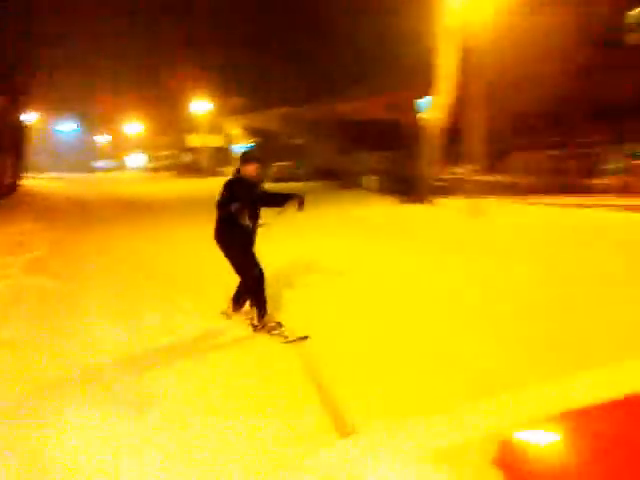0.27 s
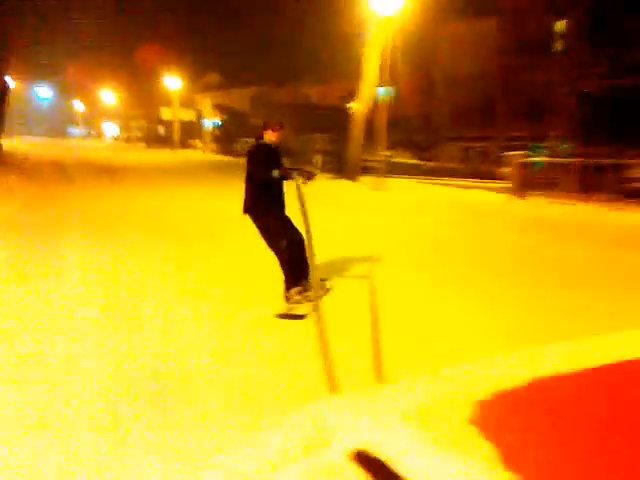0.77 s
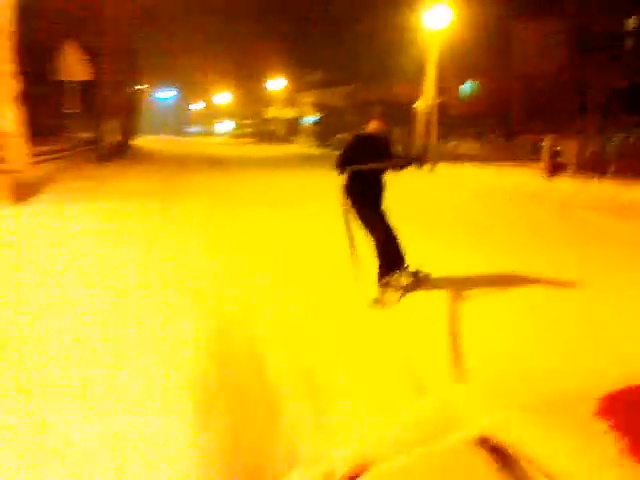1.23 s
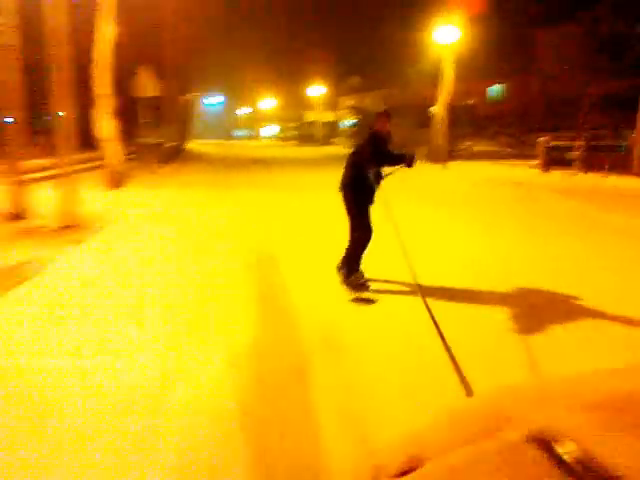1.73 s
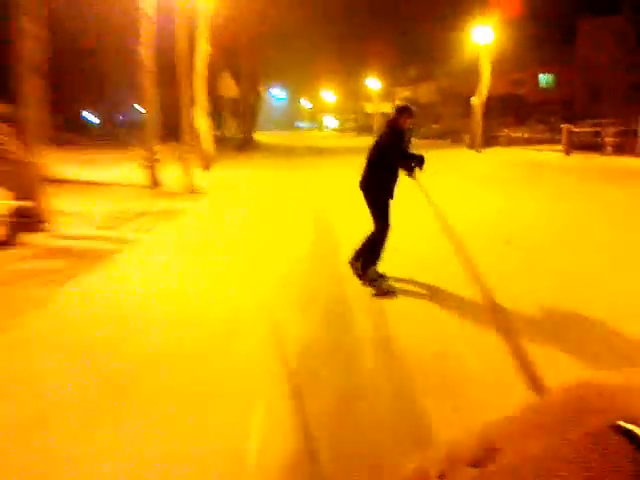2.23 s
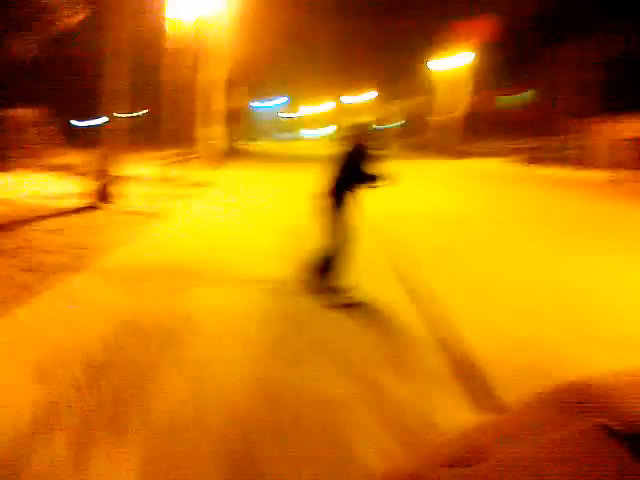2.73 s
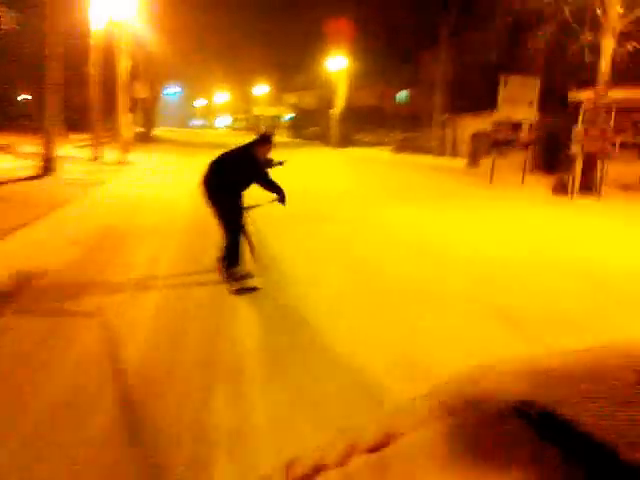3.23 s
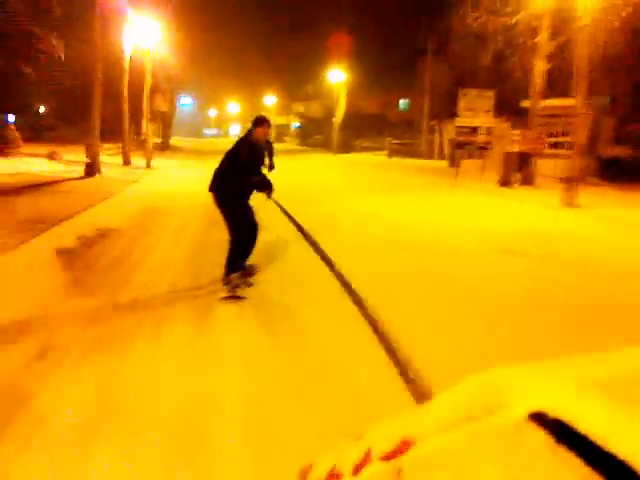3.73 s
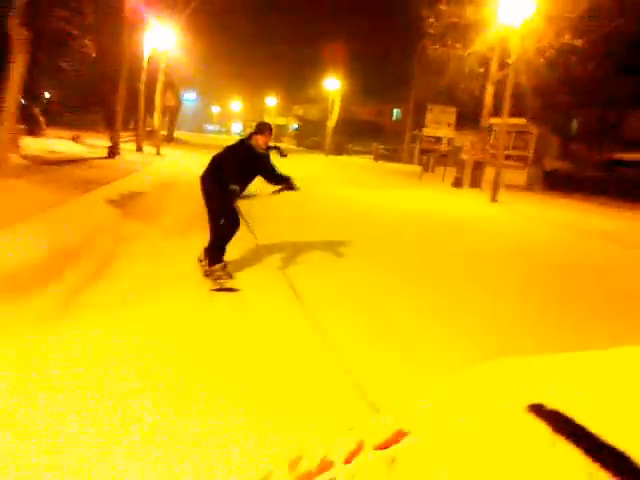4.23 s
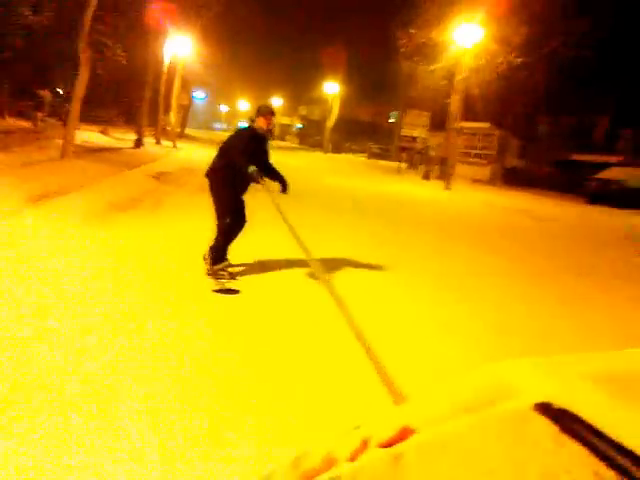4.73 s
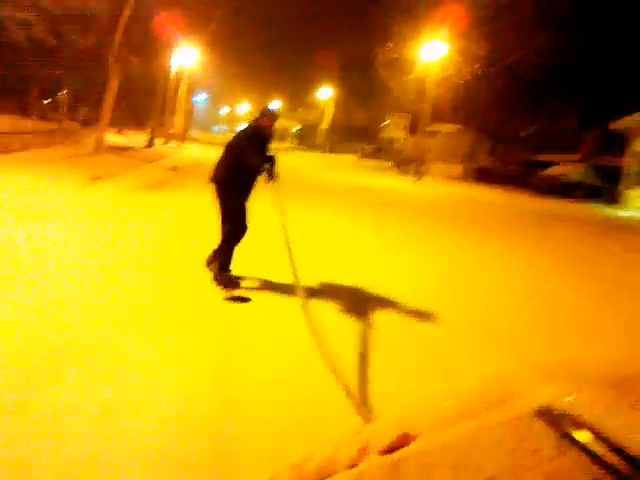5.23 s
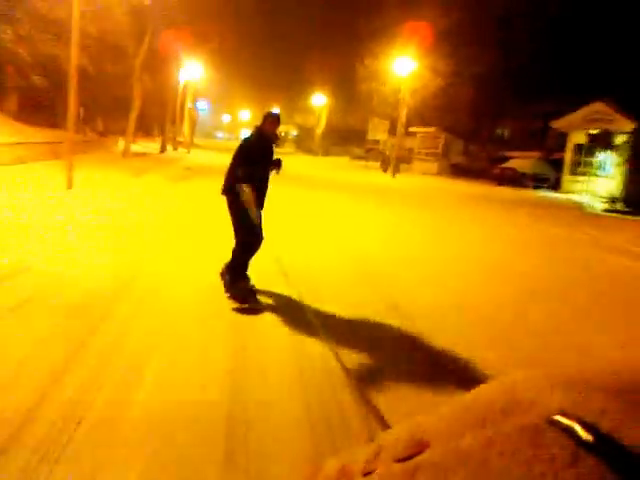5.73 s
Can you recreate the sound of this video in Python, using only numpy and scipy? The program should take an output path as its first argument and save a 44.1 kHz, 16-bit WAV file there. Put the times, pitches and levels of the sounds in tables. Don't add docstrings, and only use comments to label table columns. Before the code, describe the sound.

On a snowy street at night, a small camera held out of a moving car is battered by wind. Deep rumble and thumps run throughout; ragged rasping gusts build to about two and a half seconds, then tyres crunch through crusty snow. A quieter rumbling lull follows, and a hard bright blast of air hits near the end.

```python
import sys
import numpy as np
from scipy import signal
from scipy.fft import rfft, irfft, next_fast_len
from scipy.io import wavfile
from scipy.ndimage import uniform_filter1d, map_coordinates

SR = 44100
rng = np.random.default_rng(int(sys.argv[2]) if len(sys.argv) > 2 else 0)


def pcm_store(signal):
    levels = np.round(np.clip(np.atleast_2d(signal), -1, 1) * 32767)
    wavfile.write(sys.argv[1], SR, levels.astype(np.int16).T)


def volts(x):
    e = np.asarray(x, float) / 20
    return 10 ** e


N = 264284

# time_s, level_db
AIRSTREAM = [(0.0, -21.5), (1.3, -18.5), (1.47, -18.5), (2.5, -18.5), (3.62, -20), (3.8, -23),
             (5.15, -18.5), (5.34, -15.5), (5.99, -21.5)]
POWDER_EDGE_S = .06


def unit(x):
    return x / np.sqrt(np.mean(x ** 2) + 1e-20)


def curves(rows):
    s, *columns = np.transpose(rows)
    return [np.interp(np.arange(N) / SR, s, column) for column in columns]


def wobble(rate):
    knots = rng.standard_normal(int(N * rate / SR) + 4)
    return map_coordinates(knots, [np.arange(N) * rate / SR])


def rush(spectrum, patchy_db):
    z = signal.stft(rng.standard_normal(N), nperseg=512)[2]
    field = uniform_filter1d(rng.standard_normal(z.shape), size=8, axis=0)
    field = uniform_filter1d(field, size=6, axis=1)
    x = signal.istft(z * volts(patchy_db * unit(field)), nperseg=512)[1][:N]
    padded = next_fast_len(N + 8192)
    hz, db = np.transpose(spectrum)
    gain_db = np.interp(np.log(np.fft.rfftfreq(padded, 1 / SR) + 1), np.log(hz + 1), db)
    return unit(irfft(rfft(x, padded) * volts(gain_db), padded)[:N])


def steady(x, span_s, share):
    level = np.sqrt(np.abs(uniform_filter1d(x ** 2, size=int(span_s * SR))) + .02)
    return unit(x / level ** share)


def swells(times, levels_db, lives, lead):
    t, power = np.arange(N) / SR, np.zeros(N)
    for s, db, life in zip(times, levels_db, lives):
        span = slice(max(int((s - 3 * life) * SR), 0), int((s + 8 * life) * SR))
        u = np.clip((t[span] - s) / max(1.45 * life, .002) + lead, 0, None)
        power[span] += (volts(db) * (u * np.exp(1 - u)) ** 2) ** 2
    return power


def bursts(times, levels_db, lives):
    t, power = np.arange(N) / SR, np.zeros(N)
    for s, db, life in zip(times, levels_db, lives):
        span = slice(max(int((s - 3 * life) * SR), 0), int((s + 5 * life) * SR))
        power[span] += (volts(db) * np.exp(-((t[span] - s) / life - .8) ** 2)) ** 2
    return power


def plateaus(starts, lengths, levels_db, edge_s):
    t = np.arange(0, N, 16) / SR
    inside = np.minimum(t - starts[:, None], (starts + lengths)[:, None] - t)
    shape = np.clip(inside / edge_s + .5, 0, 1)
    power = np.sum((volts(levels_db)[:, None] * shape) ** 2, axis=0)
    return np.interp(np.arange(N) / SR, t, power)


def gusts():
    # start_s, length_s, eddy_db, tearing_db
    gust_rows = [(0.009, 0.035, -13.5, -23), (0.123, 0.17, -17, -44), (0.413, 0.099, -20, -22.5),
                 (0.553, 0.075, -17.5, -37), (0.632, .11, -12.5, -12), (0.792, 0.071, -15.5, -19),
                 (1.039, 0.074, -17, -16.5), (1.18, 0.16, -17, -24), (1.383, 0.19, -14.5, -12.5),
                 (1.6, 0.12, -16.5, -10), (1.782, 0.2, -14, -13), (1.975, 0.21, -16.5, -24),
                 (2.16, 0.172, -15, -14), (2.347, .035, -13.5, -14), (2.394, .042, -13.5, -14),
                 (2.449, .09, -14.5, -14), (5.17, .05, -20, -35), (2.531, 0.073, -16, -21),
                 (2.615, 0.117, -16.5, -15.5), (2.756, 0.055, -21, -35), (2.88, .12, -17.5, -28),
                 (3.035, 0.026, -17.5, -32), (3.185, 0.067, -22, -29), (3.281, 0.049, -14.5, -25),
                 (3.361, 0.053, -15, -22), (3.539, 0.023, -12, -23), (3.599, 0.086, -15.5, -20.5),
                 (4.021, 0.066, -21, -25), (4.399, 0.043, -17, -26), (4.768, 0.079, -15.5, -28),
                 (5.008, 0.025, -23.5, -25), (5.23, 0.089, -25, -40), (5.34, 0.31, -16.5, -23),
                 (5.823, 0.18, -16, -13.5)]
    edge_s, lull_db, lull_tear_db = .02, -7.5, -36
    s, length, eddy_db, tear_db = np.transpose(gust_rows)
    eddy = plateaus(s, length, eddy_db, edge_s) + volts(curves(AIRSTREAM)[0] + lull_db) ** 2
    tearing = plateaus(s, length, tear_db, edge_s) + volts(lull_tear_db) ** 2
    return 10 * np.log10([eddy, tearing])


def body_rumble(gust_db):
    # time_s (each peaks 24 ms later), peak_db
    heave_rows = [(0.02, -11), (0.105, -9), (0.2, -9), (0.451, -2), (0.663, -4.5), (0.8, -9), (1.049, -5),
                  (1.18, -12), (1.28, -4.5), (1.423, -4), (1.579, -4), (1.758, -7), (1.969, -6),
                  (2.147, -6), (2.432, -6), (2.55, -7), (2.679, -4), (2.77, -6), (2.888, -5), (3.088, -11),
                  (3.29, -10), (3.548, -4.5), (3.632, -6), (3.786, -11), (4.054, -10), (4.241, -8),
                  (4.392, -11), (4.605, -8), (4.772, -7), (4.958, -14), (5.2, -8), (5.28, -7), (5.369, -4),
                  (5.509, -5), (5.81, -2), (5.9, -6)]
    # pitch_hz, density_db (per Hz)
    swing = [(7, -35), (14, -6), (28, 6), (50, 4.5), (85, -0.5), (115, -12.5), (160, -39.5), (260, -120)]
    s, db = np.transpose(heave_rows)
    pushes = swells(s, db - 8.5, np.full(len(s), .029), lead=0.43)
    rumble = np.sqrt(volts(curves(AIRSTREAM)[0] - 6) ** 2 + volts(gust_db - 11) ** 2 + pushes)
    rumble = rumble * volts(1.1 * wobble(9) + 1.8 * wobble(25))
    return rumble * steady(rush(swing, patchy_db=0), span_s=.04, share=.95)


def eddies(gust_db, flutter):
    # pitch_hz, density_db (per Hz)
    eddy_spectrum = [(15, -52.5), (40, 1.5), (90, 1.5), (150, -1), (300, -7), (500, -13.5), (900, -18),
                     (2000, -31.5), (4000, -83), (16000, -120)]
    level = volts(gust_db + 0.71 + 1.26 * wobble(18))
    return level * unit(flutter) * steady(rush(eddy_spectrum, patchy_db=2), span_s=.03, share=0.58)


def rim_tears(tear_db):
    # time_s (each peaks 4 ms later), peak_db, thump_db
    single_tears = [(0.648, -20, 0), (0.679, -12.5, 5), (0.815, -9.5, -6.5), (0.83, -17, -2),
                    (0.895, -16, -4), (1.043, -15.5, -14), (1.187, -8.5, 2.5), (1.268, -11, -3),
                    (1.401, -7, 4.5), (1.43, -8, -9), (1.4672, -6, -4), (1.503, -6.5, -1.5),
                    (1.635, -4.5, -0.5), (1.66, -8, 1), (1.697, -9, 2), (1.789, -8.5, 0), (1.875, -12, -2),
                    (1.943, -9, -1.5), (2.17, -12.5, -1), (2.208, -9.5, 2), (2.233, -7, 3), (2.291, -9.5, -2),
                    (2.317, -6.5, 3.5), (2.361, -2.5, -8), (2.42, -6, -0.5), (2.476, -5, -3), (4.793, -20, 4),
                    (5.2805, -17, 6), (5.345, -20.5, 12.5), (5.5013, -12.5, 2.5), (1.197, -9, 0),
                    (1.216, -12, 0), (1.312, -9.5, -1), (1.337, -16, 5), (1.444, -8.5, -0.5), (1.555, -12, 0),
                    (1.574, -15, 1), (1.602, -17, 1), (1.619, -16, 4), (1.678, -10.5, 2), (1.854, -17, 7),
                    (1.925, -13.5, 0), (2.113, -15.5, 3), (2.134, -15.5, 1), (2.191, -13, 4),
                    (2.264, -10.5, 0), (2.303, -11.5, 1), (2.325, -10, 0), (2.3486, -14, 2), (2.372, -6, -2),
                    (2.398, -11.5, 3), (2.432, -7, -4), (2.452, -19, 0), (2.4614, -12.5, 2), (2.491, -11, -1),
                    (2.516, -9, -1.5), (2.527, -13, 3),
                    (0.015, -22, 4), (3.195, -27, 18), (3.216, -27.5, 15.5), (4.416, -30, -2),
                  (4.6276, -18, -7), (4.812, -28, 15.5), (5.018, -27, 4), (5.393, -19.5, 9.5),
                  (5.426, -15, 3), (5.467, -14, 2.5), (5.536, -17.5, 9), (5.63, -17, 4),
                  (5.241, -23.5, 0.5), (5.265, -24, -2), (5.358, -15, -1), (5.413, -18.5, 1),
                  (5.455, -19, 1), (5.513, -15.5, -2), (5.616, -20, 1), (5.075, -24, 2), (4.82, -24, 3),
                  (0.03, -20, 5), (0.153, -26, 10), (0.217, -25, 9), (0.272, -27, 11), (0.438, -25, 7),
                  (0.485, -22, 5), (0.588, -23, 6), (0.702, -16, 4), (0.733, -19, 3), (0.845, -18, 2),
                  (4.045, -24, 8), (0.665, -17, 2)]
    life_s, gap_s, shed_db = 0.0036, 0.03, -9
    chance = rng.standard_normal((250, 4))
    s = np.cumsum(gap_s * np.exp(.35 * chance[:, 0]))
    db = shed_db + np.interp(s * SR, np.arange(N), tear_db) + 2.5 * chance[:, 1]
    shed = np.transpose([s, db, 2.06 * chance[:, 2], life_s * np.exp(0.13 * chance[:, 3])])
    listed = [(*row, life_s) for row in single_tears]
    return np.vstack([shed[s < N / SR], listed])


def port_thumps(tears):
    # pitch_hz, density_db (per Hz)
    thump = [(60, -56), (120, -15), (250, 13), (500, 8), (900, -7.5), (1600, -35), (4000, -120)]
    s, db, thump_db, life = tears.T
    power = swells(s, db + thump_db - 4.5, 1.33 * life, lead=0.47)
    return np.sqrt(power) * steady(rush(thump, patchy_db=2), span_s=.012, share=.7)


def tear_rasps(tears, tear_db, flutter, snaps):
    # pitch_hz, density_db (per Hz)
    rasp = [(100, -87.5), (300, -35), (700, 4), (1200, 3), (2000, -2), (3000, -10.5), (4200, -24.5),
            (7000, -40), (11000, -47.5), (16000, -67.5)]
    s, db, _, life = tears.T
    level = np.sqrt((volts(tear_db - 20) * unit(flutter)) ** 2 + bursts(s, db - 8, 1.35 * life))
    return level * steady(unit(snaps * rush(rasp, patchy_db=0.1)), span_s=.008, share=.8)


def slap_blast(slaps, snaps):
    # pitch_hz, density_db (per Hz)
    blast = [(500, -5.5), (1200, -3.5), (3000, -9), (6000, -24), (9000, -37), (16000, -44)]
    s, db, _, life = np.transpose(slaps)
    level = np.sqrt(bursts(s, db - 6, 1.3 * life))
    return level * steady(unit(snaps * rush(blast, patchy_db=1)), span_s=.007, share=.8)


def wind(gust_db, tear_db):
    # time_s (each peaks about one life later), peak_db, thump_db, life_s
    slaps = [(5.8272, -15, -18, 0.0015), (5.835, -14, 6, 0.003), (5.8428, -14, -3, 0.0037),
             (5.8524, -18, -6, 0.0063), (5.862, -15.5, 7, 0.0041), (5.869, -7.5, 2, 0.0031),
             (5.874, -7.5, -6.5, 0.0033), (5.88, -9, -4, 0.002), (5.893, -17.5, -2, 0.0039),
             (5.901, -30, -4, 0.0056), (5.905, -13.5, -18, 0.0013), (5.9415, -15.5, -7, 0.0017),
             (5.95, -13, -1, 0.0022), (5.954, -15, -6, .002), (5.97, -27, 3, .003),
             (5.9585, -23, -1, 0.0023), (5.979, -23, -8, 0.0043)]
    flutter = volts(1.6 * wobble(40) + 2.4 * wobble(120))
    tears = rim_tears(tear_db)
    low = body_rumble(gust_db) + eddies(gust_db, flutter) + port_thumps(np.vstack([tears, slaps]))
    low = .8 * np.tanh(low / .8)
    snaps = volts(3.5 * wobble(450))
    return low + tear_rasps(tears, tear_db, flutter, snaps) + slap_blast(slaps, snaps)


def snow_spray(level_db, tear_db, grain):
    # start_s, length_s, level_db
    shower_rows = [
        (0.558, 0.12, -52.5),
        (1.081, 0.16, -50),
        (1.203, 0.13, -44),
        (2.0, 0.21, -56.5),
        (2.565, 0.48, -45.5),
        (2.997, .38, -43.5),
        (3.926, .16, -59),
    ]
    # pitch_hz, density_db (per Hz)
    fizz = [(2500, -16), (4500, -4.5), (7000, -11.5), (11000, -21.5), (16000, -44)]
    wheel_db = -54 + 1.5 * (level_db + 20.5)
    power = volts(wheel_db) ** 2 + volts(tear_db - 46.5) ** 2 + volts(-65) ** 2
    spray_db = 10 * np.log10(power + plateaus(*np.transpose(shower_rows), POWDER_EDGE_S))
    out = volts(spray_db - 5.5) * unit(volts(0.48 * grain) * rush(fizz, patchy_db=2))
    specks = (rng.random(N) < 60 / SR) * volts(3.1 * rng.standard_normal(N))
    band = signal.butter(2, [6500, 13000], "bandpass", fs=SR, output="sos")
    return out + volts(spray_db + 6.5) * signal.sosfilt(band, specks)


def crust_breaks(level_db):
    # start_s, peak_db, pitch_hz, life_s
    crunch_rows = [(2.5966, -3.5, 1660, 0.0037), (2.8585, 1.5, 2120, 0.0037), (2.95, -1, 1450, 0.0031),
                   (2.9858, -5, 1870, 0.0065), (3.0005, 1.5, 1350, 0.0016), (3.0447, -3, 2200, 0.003),
                   (3.0713, -3.5, 1290, 0.005), (3.108, -1.5, 1730, 0.005), (3.13, -1, 1410, 0.0037),
                   (3.932, -13.5, 2400, 0.0056), (3.1564, 1, 1280, 0.003), (3.252, -0.5, 1910, 0.0084),
                   (3.263, 0, 2140, 0.012), (3.289, -2.5, 1940, 0.003), (3.3105, -4.5, 1810, 0.009),
                   (3.323, -2, 1810, 0.0033), (3.3707, -2, 1320, 0.0036), (3.3985, -1, 1920, 0.0061),
                   (3.4096, -1.5, 1626, 0.023), (3.4178, -2, 1740, 0.0029), (3.4464, -5, 1196, 0.013),
                   (3.464, -1.5, 1770, 0.0043), (3.513, -9.5, 1250, 0.0087), (3.5927, -6, 1260, 0.0072),
                   (3.6416, -2.5, 1860, 0.0039), (3.734, 0, 1810, 0.004), (3.7402, -4, 1365, 0.0068),
                   (3.753, -6.5, 1770, 0.0086), (3.8992, -8, 1390, 0.013), (4.016, -12.5, 1820, 0.0058),
                   (2.6895, -14, 1230, .004), (2.726, -12, 1380, .004), (2.771, -14, 1350, 0.0036),
                   (2.8816, -12, 1680, .004), (3.135, -2, 1630, .003), (3.1405, 1, 1490, .003),
                   (3.1944, -10, 1090, .004), (3.2376, -7, 2260, .004), (3.6608, -13, 1500, .004),
                   (3.7065, -10, 1950, .004), (3.807, -18, 1300, .004), (3.844, -13, 1500, .004),
                   (3.865, -15, 1700, .004), (3.973, -16.5, 2170, 0.0044)]
    crumbs_per_s, crumb_db, crumb_hz = 30, -3, 1600
    out, t = np.zeros(N), np.arange(SR // 16) / SR
    luck = rng.random((60, 3))
    crumb_s = 2.6 + (np.arange(len(luck)) + luck[:, 0]) / crumbs_per_s
    breaks = list(crunch_rows)
    for s, (_, a, b) in zip(crumb_s, luck):
        if s < 4.05:
            db = level_db[int(s * SR)] + crumb_db + 8 * a
            breaks.append((s, db, crumb_hz * (0.699 + 0.736 * b), .005))
    for s, db, hz, life in breaks:
        u = t / max(life, .002)
        ring = .55 * np.sin(2 * np.pi * hz * t) * np.exp(-1.5 * u)
        hit = u ** 0.62 * np.exp(-1.8 * u) * (rng.standard_normal(len(t)) + ring)
        band = signal.butter(4, [.6 * hz, 1.4 * hz], "bandpass", fs=SR, output="sos")
        hit = signal.sosfilt(band, hit)
        seat = out[round((s - .0015) * SR):][:len(t)]
        seat += volts(db - 2.5) * (hit / np.abs(hit).max())[:len(seat)]
    return out


def tyres(tear_db):
    # time_s, level_db
    crust_level = [(0.1, -59), (0.63, -45), (1.01, -25.5), (1.28, -22), (1.44, -32.5), (1.83, -40),
                   (2.22, -31), (2.34, -31.5), (2.88, -21.5), (3.05, -16), (3.18, -18), (3.31, -19),
                   (3.45, -16), (3.54, -29), (3.81, -24.5), (4.02, -38.5), (4.3, -38), (4.7, -43.5)]
    # pitch_hz, density_db (per Hz)
    snow = [(350, -28), (600, -11.5), (728, -8), (817, -0.5), (935, -7), (1320, 1.5), (2270, -4),
            (2750, -9.5), (3060, -14), (3640, -18.5), (4320, -31.5), (6000, -37), (7800, -62),
            (13200, -120)]
    level_db, = curves(crust_level)
    grain = 1.2 * wobble(40) + 2.6 * wobble(220)
    hiss = volts(level_db - 1.97) * unit(volts(grain) * rush(snow, patchy_db=0))
    return hiss + snow_spray(level_db, tear_db, grain) + crust_breaks(level_db)


def grit():
    # time_s, peak_db, band_8khz_db, band_4_5khz_db (bands relative to the peak)
    grain_rows = [(0.5891, -51.5, 10, 0), (1.0174, -44.5, 6, -3), (1.218, -49.5, 0, 6),
                  (1.2845, -42, -6, 3.5), (1.4611, -47, -4, 15), (1.488, -45, -14, 9),
                  (1.511, -33, -21, -6.5), (1.5399, -38, -19, -7), (1.6167, -48, -3, -1),
                  (2.36, -46, 1, 16), (2.5152, -42, -1, 17), (2.9512, -42, 0, 0), (3, -38, -16, -7),
                  (3.108, -33.5, -5, 1), (3.5673, -59, -21, 3), (3.6405, -53, 16, 18), (3.734, -63, 19, 11),
                  (3.934, -57, 7, 14), (4.0533, -50, 12, 0), (4.061, -58, 16, 6), (4.39, -45, 0, -3),
                  (5.678, -57.5, -4, 5), (5.8274, -18, -15, 6), (5.8374, -51, 1, 11), (5.862, -22, -8, -3),
                  (5.882, -33, -9, -2), (5.892, -20.5, -12, -6), (5.976, -41.5, -10, 7),
                  (5.9884, -38.5, -17, -2), (1.0966, -48.5, -10, -5), (1.131, -46.5, -12, -5),
                  (1.234, -51, -5, -5), (1.2692, -45, -10, -5), (1.296, -50, 0, 0), (3.6605, -62, 5, 12),
                  (3.958, -62, 5, 12), (4.315, -66, 0, 8), (4.51, -64, 3, 5), (4.535, -62, 3, 5),
                  (4.78, -60, 0, 3), (4.955, -64, 3, 8), (5.015, -63, 3, 8), (5.175, -62, 3, 5),
                  (0.22, -62, 0, 5), (0.46, -64, 0, 5), (5.345, -62, 0, 5)]
    out, t = np.zeros(N + SR), np.arange(-64, 64) / SR

    def blip(hz, width_s):
        return np.cos(2 * np.pi * hz * t) * np.exp(-(t / width_s) ** 2)

    for s, db, mid_db, low_db in grain_rows:
        tick = blip(12500, .00009)
        tick += volts(mid_db + 4.5) * blip(8200, 0.00019)
        tick += volts(np.minimum(low_db, 6) - 3) * blip(4500, 0.00014)
        out[max(round(s * SR) - 64, 0):][:len(t)] += volts(db - 0.5) * tick
    return out[:N]


def whistle():
    # start_s, length_s, pitch_hz, rise_hz_per_s, level_db, fade_db_per_s
    edge_tone = (5.733, .078, 815, 2200, -29, -50)
    start, length, hz, rise, db, fade = edge_tone
    u = np.arange(N) / SR - start
    gate = np.clip(np.minimum(u, length - u) / 0.012, 0, 1)
    level = volts(db + fade * np.clip(u, 0, length) + 1.9 * wobble(43.16))
    return level * gate * np.sin(2 * np.pi * (hz + rise * u / 2) * u)


def flap():
    # centre_s, half_length_s, pitch_hz, peak_db
    flutter_tone = (4.803, 0.0358, 135.5, -9)
    centre, half, hz, db = flutter_tone
    u = np.arange(N) / SR - centre
    return volts(db) * np.exp(-(u / half) ** 2) * np.sin(2 * np.pi * hz * u)


def powder():
    # pitch_hz, density_db (per Hz)
    sizzle_spectrum = [(2600, -58), (3300, -14), (3650, -1), (4000, -8), (4600, -37), (6000, -120)]
    # start_s, length_s, level_db
    sizzle_rows = [
        (1.08, 0.23, -50),
        (2.74, .25, -42),
        (3.2, 0.18, -50),
    ]
    # pitch_hz, density_db (per Hz)
    airy = [(4000, -29.5), (6500, -1), (10000, -6.5), (13000, -10), (15800, -19.5)]
    level = np.sqrt(plateaus(*np.transpose(sizzle_rows), POWDER_EDGE_S)) * volts(1.7 * wobble(60))
    sizzle = level * rush(sizzle_spectrum, patchy_db=1)
    return sizzle + volts(-76 + 2.5 * wobble(6) + 2.5 * wobble(30)) * rush(airy, patchy_db=1)


def street():
    # pitch_hz, density_db (per Hz)
    roll = [(240, -33), (400, -12), (511, -12), (673, -4), (772, -7), (957, -2), (1070, 3), (1710, -1.5),
            (2150, -16), (2880, -12), (4560, -31.5), (5650, -36.5), (10100, -54.5), (15500, -76.5)]
    return volts(-35.5 + 1.5 * wobble(20)) * rush(roll, patchy_db=2)


def scene():
    gust_db, tear_db = gusts()
    mix = wind(gust_db, tear_db) + tyres(tear_db) + grit() + whistle() + flap() + powder() + street()
    return mix[None]


def band_limit(x):
    return signal.sosfilt(signal.butter(12, 16530, fs=SR, output="sos"), x)


def record(dry):
    rounded = dry / (1 + np.abs(dry) ** 8) ** (1 / 8)
    spectrum = rfft(rounded) * (np.fft.rfftfreq(N, 1 / SR) < 15820)
    return band_limit(irfft(spectrum, N))


dry = scene()
out = record(dry)
pcm_store(out)
```